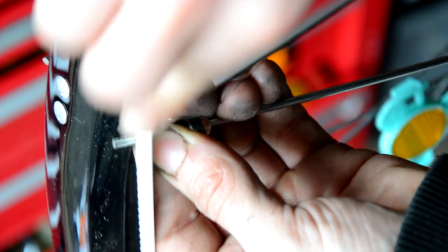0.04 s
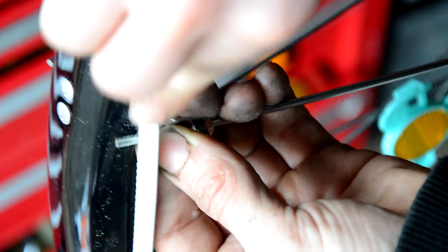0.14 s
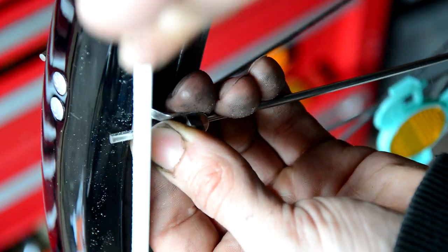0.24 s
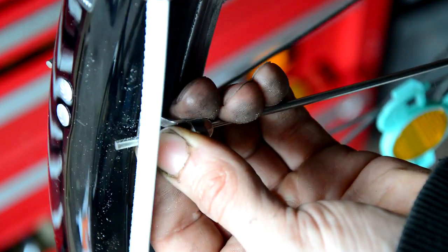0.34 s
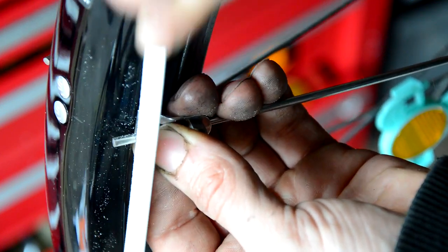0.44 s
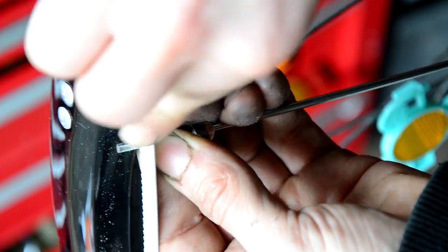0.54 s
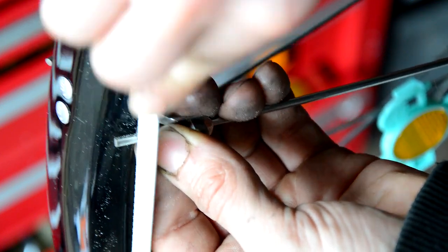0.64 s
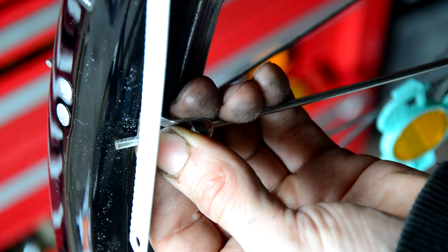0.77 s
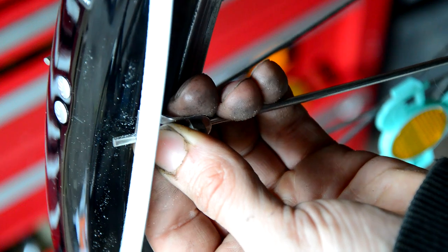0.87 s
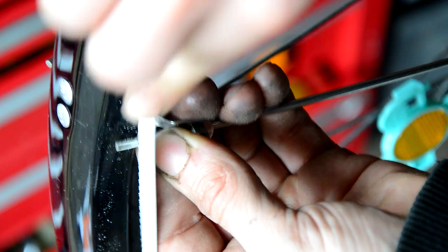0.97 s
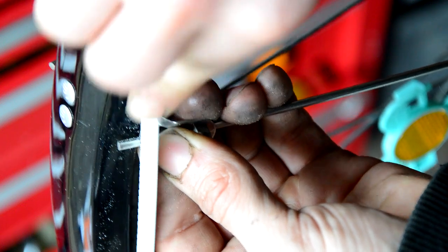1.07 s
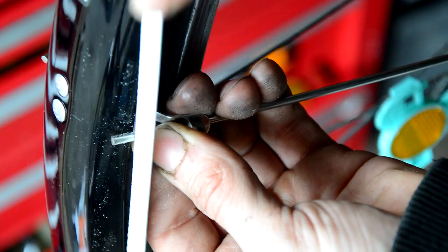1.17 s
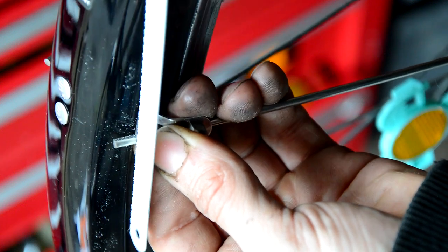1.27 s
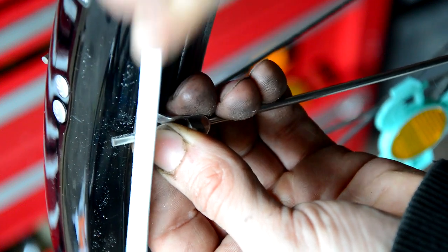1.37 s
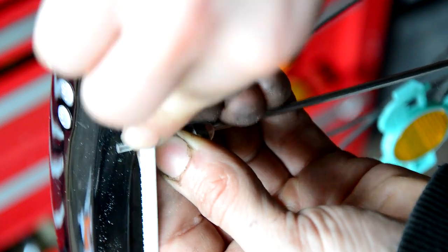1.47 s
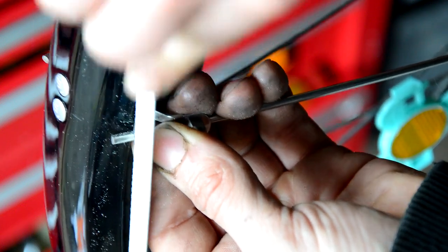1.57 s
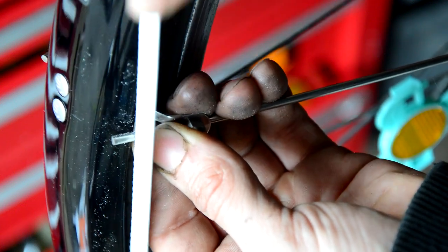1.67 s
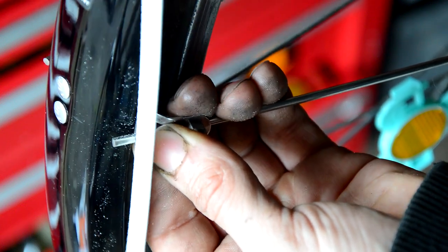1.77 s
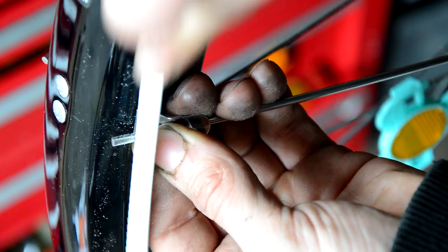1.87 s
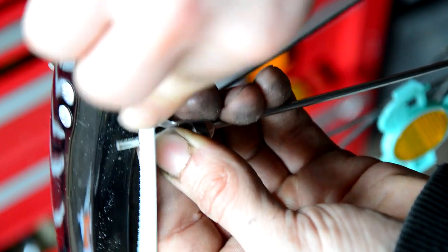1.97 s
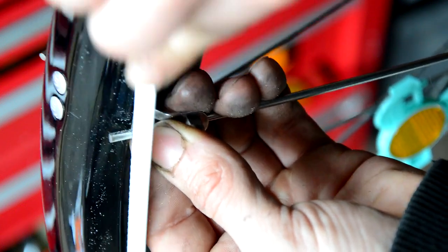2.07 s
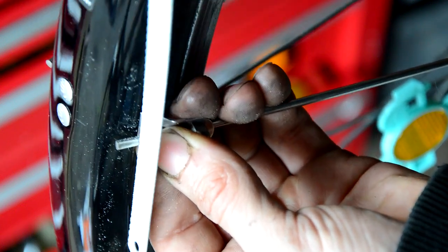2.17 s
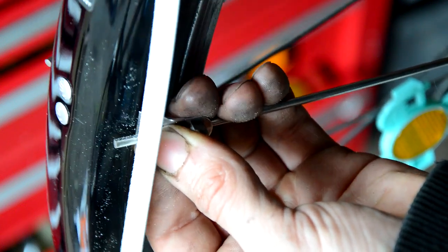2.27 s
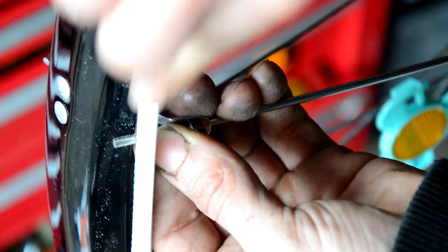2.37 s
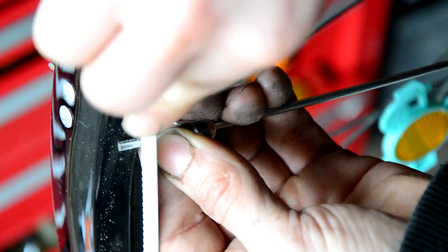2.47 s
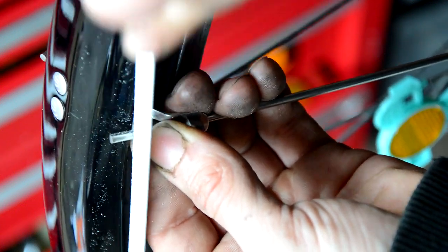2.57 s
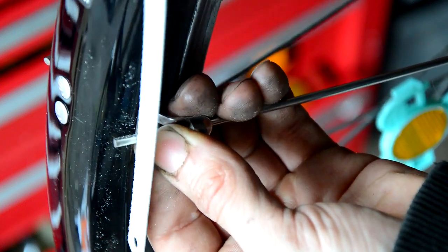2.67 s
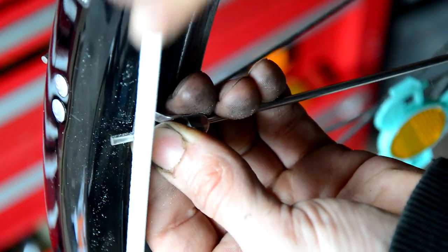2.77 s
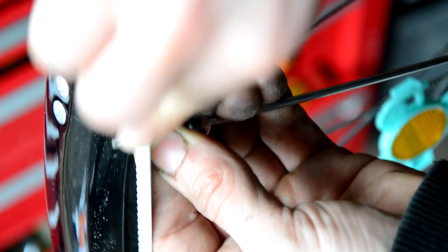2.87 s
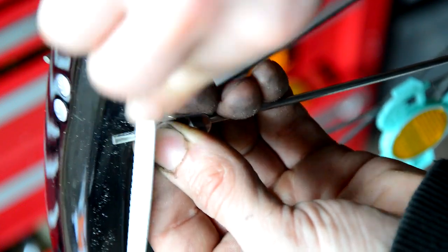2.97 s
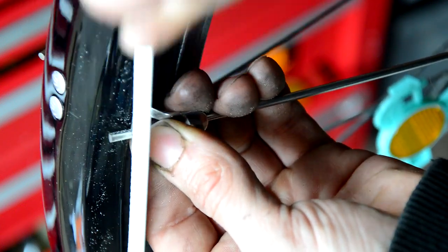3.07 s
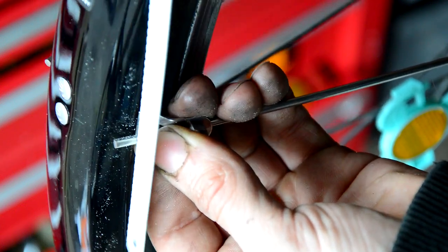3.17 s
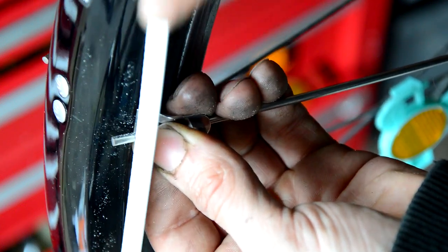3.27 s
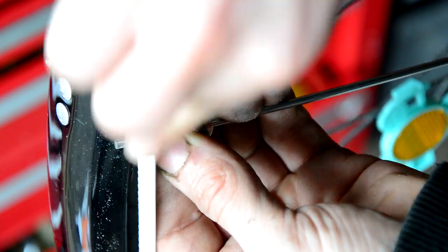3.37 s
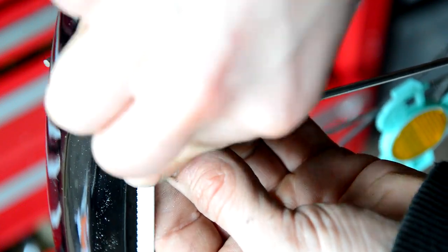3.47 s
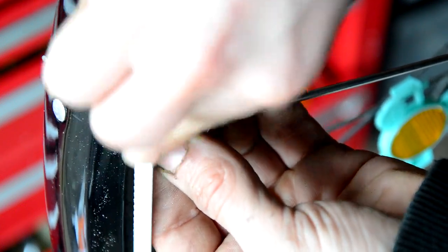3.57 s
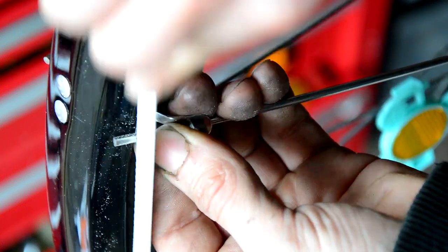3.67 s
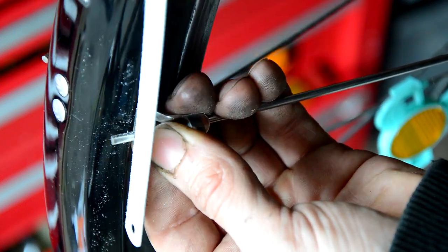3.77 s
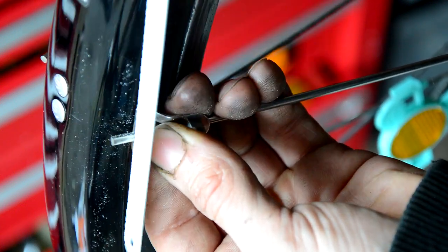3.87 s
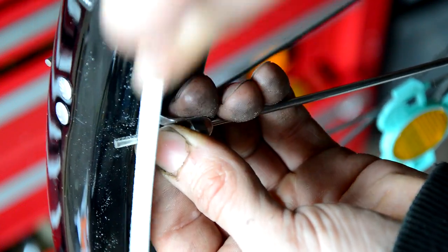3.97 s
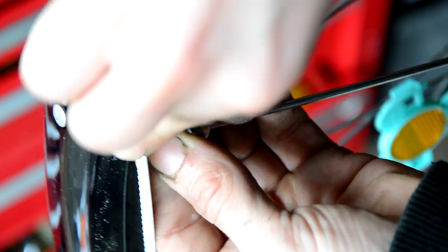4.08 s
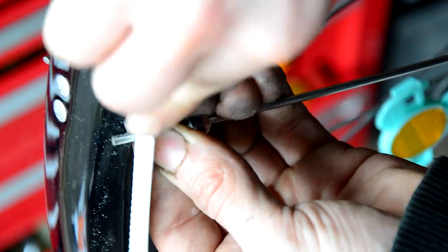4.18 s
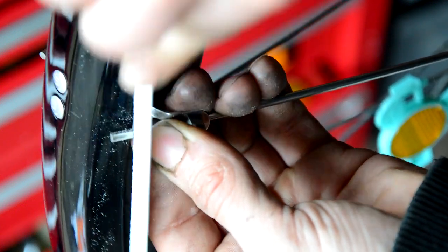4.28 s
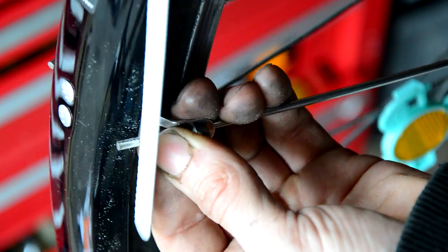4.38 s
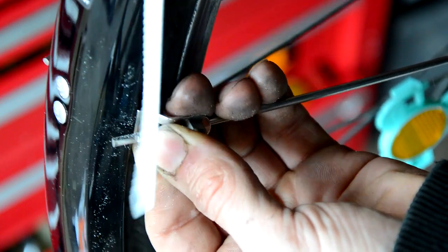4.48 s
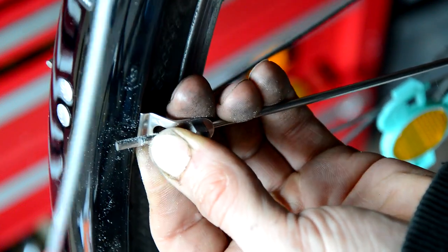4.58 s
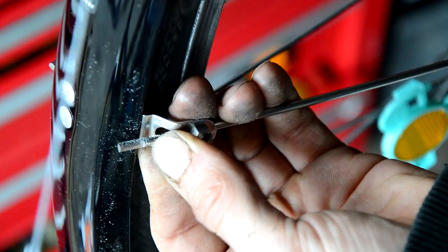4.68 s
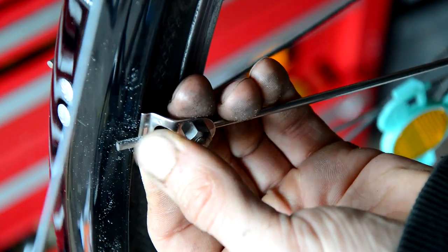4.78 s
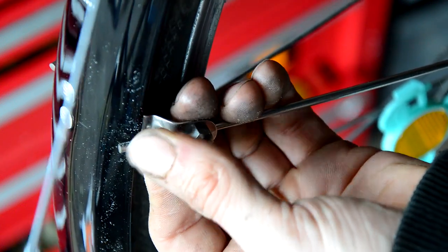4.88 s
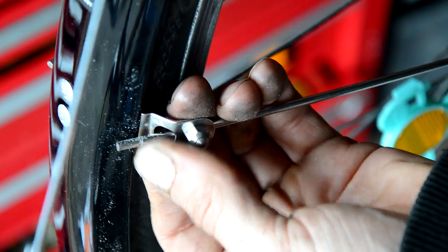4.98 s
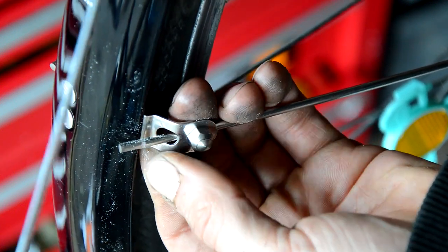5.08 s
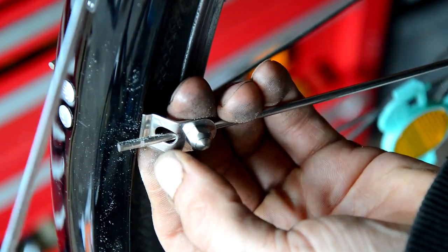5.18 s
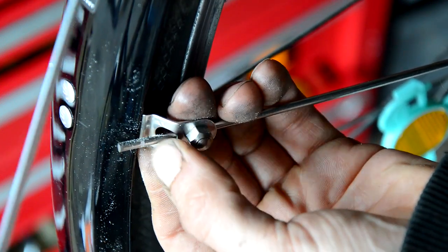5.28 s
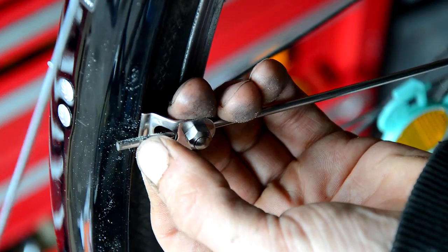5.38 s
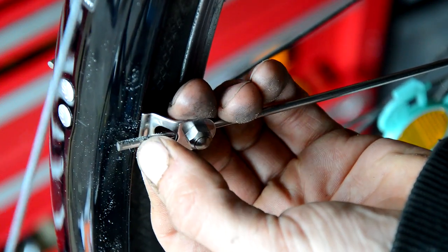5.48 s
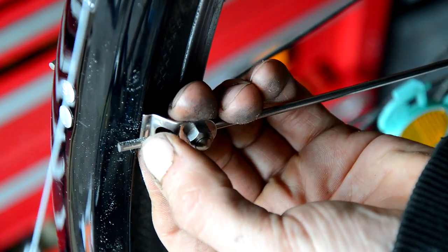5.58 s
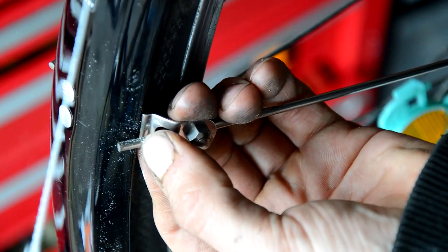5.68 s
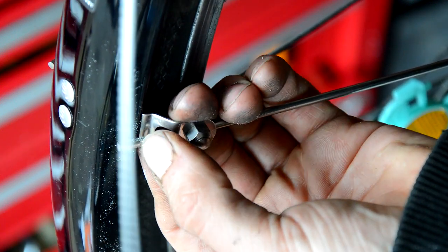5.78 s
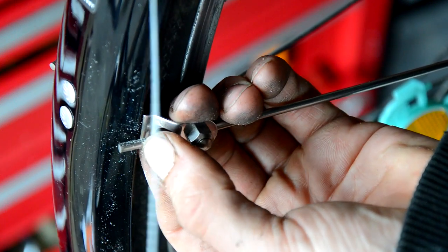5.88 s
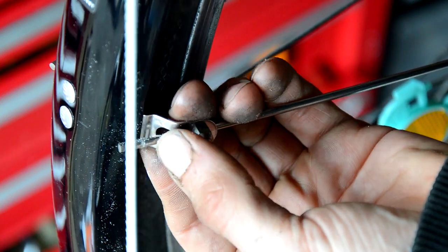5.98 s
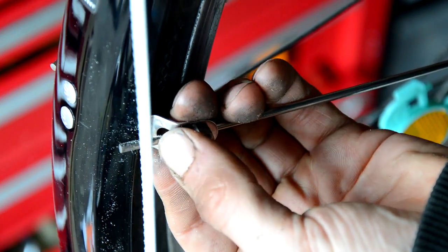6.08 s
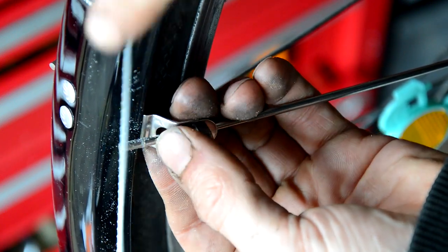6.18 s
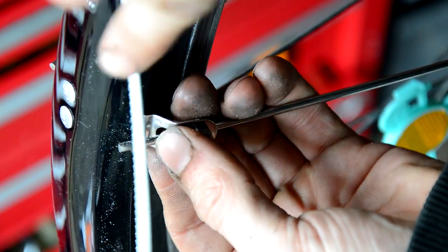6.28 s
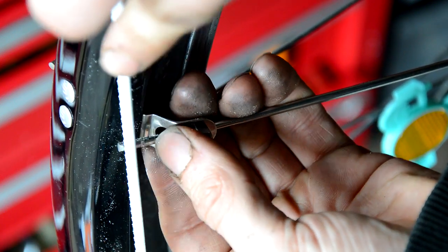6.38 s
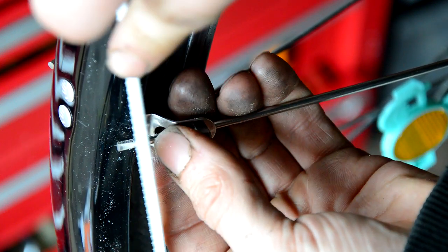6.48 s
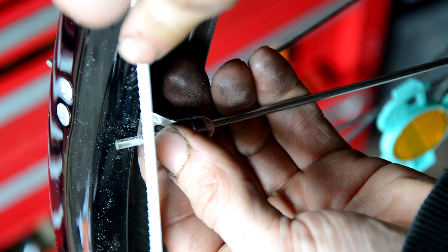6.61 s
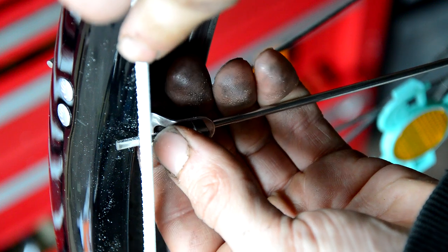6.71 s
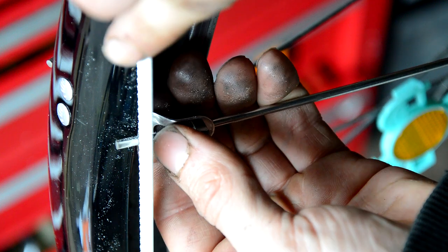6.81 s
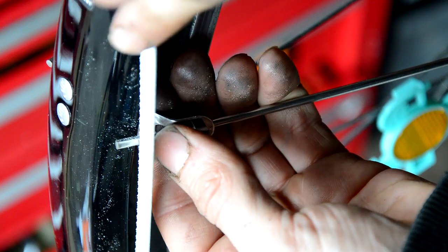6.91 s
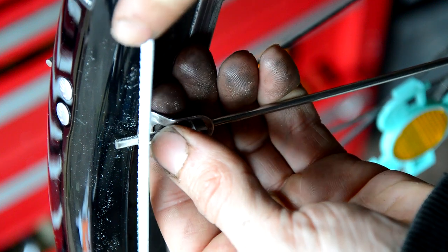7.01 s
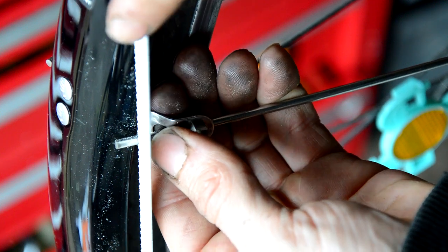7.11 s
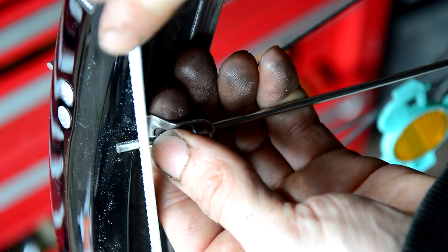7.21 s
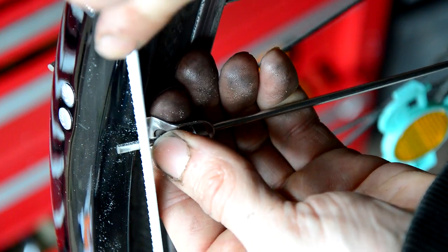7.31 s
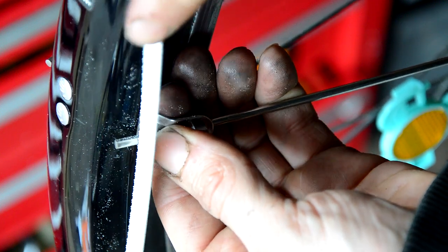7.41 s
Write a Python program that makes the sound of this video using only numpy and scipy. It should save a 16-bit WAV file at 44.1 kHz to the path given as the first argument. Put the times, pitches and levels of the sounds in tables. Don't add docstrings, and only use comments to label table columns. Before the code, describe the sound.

Very close to the microphone, a hand saws a thin steel rod with a bare hacksaw blade, about four strokes a second, gritty and ringing, with sharp snags and a gliding metallic song. The last strokes slow and catch hard. Then near silence with faint distant traffic hiss and engine drone, before small knocks and short scrapes as the blade is set down again in a small garage.

```python
import sys
import numpy as np
from scipy import signal
from scipy.fft import rfft, irfft
from scipy.io import wavfile
from scipy.ndimage import uniform_filter1d, map_coordinates

SR = 44100
rng = np.random.default_rng(int(sys.argv[2]) if len(sys.argv) > 2 else 0)


def generate_wav(signal):
    frames = np.transpose(np.atleast_2d(signal))
    scaled = np.clip(frames, -1, 1) * 32767
    pcm = np.round(scaled).astype(np.int16)
    wavfile.write(sys.argv[1], SR, pcm)


def voltage_ratio(decibels):
    exponent = np.asarray(decibels, float) / 20
    return 10 ** exponent


N = 328545
T = np.arange(N) / SR

# (frequency [Hz], density [dB per Hz])
ROAD_SPECTRUM = [(12, -47), (20, -1.5), (90, -7), (119, -5.5), (141, -11.5), (166, -13), (202, -14.5),
                 (291, -9.5), (441, -14.5), (480, -11.5), (536, -11.5), (886, -6.5), (3020, -23.5),
                 (15600, -32)]
# (time [s], level [dB])
ROAD_LEVEL = [(0.0, -47), (7.45, -49)]
# (time [s], free blade length [half-waves of 12 kHz bending])
REVERSALS = [(-.1, 8), (.15, 10.4), (.39, 6.8), (.61, 11.3), (.87, 8.3), (1.1, 9.6), (1.31, 6.5),
             (1.55, 15.2), (1.79, 6.4), (2.03, 16.5), (2.27, 7.7), (2.52, 13.8), (2.74, 7), (2.98, 11.3),
             (3.22, 7.34), (3.569, 14.2), (3.87, 6.1), (4.19, 11.2), (4.56, 5.3)]
# (time the teeth catch [s], length [s], scrape level [dB], place of the peak [0-1], catch level [dB])
STROKES = [(-.08, 0.18, -22, 0.66, -40), (0.186, 0.17, -21.5, 0.59, -19), (0.402, 0.16, -22, 0.58, -19.5),
           (0.6456, 0.19, -21.5, 0.6, -21.5), (0.887, 0.16, -21, 0.52, -20), (1.136, 0.16, -21, 0.36, -28),
           (1.3344, 0.19, -22.5, 0.57, -15.5), (1.5863, 0.17, -21, 0.48, -18),
           (1.8074, 0.16, -22.5, 0.57, -20), (2.071, 0.18, -22, 0.51, -32), (2.293, 0.21, -21.5, 0.53, -17),
           (2.554, 0.16, -20, 0.55, -20), (2.758, 0.17, -19, 0.59, -16.5), (3.0084, 0.19, -21, 0.55, -41),
           (3.243, 0.28, -24, 0.44, -9.5), (3.6253, 0.22, -21.5, 0.47, -28), (3.906, 0.2, -22, 0.65, -13.5),
           (4.2114, 0.25, -22.5, 0.63, -20)]
# (time [s], peak level [dB], thud above it [dB], fizz above it [dB])
SNAGS = [(.4387, -12, -20, 0.5), (.6713, -13, -6, -6), (.706, -11.5, -5, -16), (.7297, -8.5, -11, -25),
         (1.047, -11.5, -5, -7), (1.1349, -23, -1, -16.5), (1.1486, -10, -25, -28), (1.374, -21, -20, 4),
         (1.4301, -9.5, -16.5, 1), (1.4494, -5.5, -14, -17.5), (1.497, -13.5, -24, -2.5),
         (1.938, -5.5, -22, -9), (2.16, -10, -23, -24), (2.3179, -15.5, -23.5, 1), (2.6193, -11.5, 1.5, 0),
         (2.7829, -16, -6, 5), (2.904, -8, 0.5, -9), (3.021, -16, -21, -15), (3.3024, -14, -21.5, -1),
         (3.3356, -7.5, -13, -3), (3.4443, -8.5, -6.5, -6), (3.4823, -13.5, -4, -3.5),
         (4.121, -6.5, -8, -8.5), (4.2621, -19, -10.5, -18), (4.2774, -10.5, -12, -11),
         (4.3116, -2, -20.5, -10), (4.334, -3, -16, -7.5), (4.4369, -9, -12, -27), (4.4747, -11, -23, -4.5),
         (4.488, -14.5, -15, -3.5)]
# (at full pressure [dB],
# follow [dB per dB of pressure], reach [dB per doubled blade length], push [dB])
CUT_PATHS = [(-6.5, 0.61, 1, 1.5), (-4.5, 1.4, -5.5, -1), (-19, 0.27, 1, -1.5)]
# (frequency [Hz], width [Hz], level [dB])
CUT_MODES = [(251.8, 6.2, -6), (308, 16, -9.5), (515, 9.9, -7.5), (694, 31, -5.5), (811, 69, -3.5),
             (1126, 17, 3), (1181, 53, 0.5), (1576, 136, -7.5), (1994, 44, -6), (2606, 60, -7),
             (2763, 48, -4), (3088, 61, -3), (3260, 41, 0), (3332, 40, -0.5), (3870, 150, -10.5),
             (4360, 22, -4.5), (4890, 94, -10.5), (5278, 79, -8.5), (6070, 27, -10.5), (6380, 290, -18),
             (7210, 150, -12), (7800, 67, -20), (8800, 140, -19.5), (9000, 63, -23), (9800, 60, -19)]
# (frequency [Hz], density [dB per Hz])
STEEL_BED = [(90, -58.5), (190, -18), (420, -16.5), (800, -10), (1000, -9), (1400, -9), (2300, -15),
             (3300, -20), (3650, -12), (6000, -13.5), (10000, -22), (12500, -27.5), (16000, -62)]
# (time [s], firing rate [Hz], level [dB], second order level [dB])
PASSING_ENGINE = [
    (.85, 37.2, -54, -58),
    (1.2, 67.2, -46, -44),
    (1.37, 69.2, -47, -63),
    (1.47, 69.4, -47.5, -44),
    (2.01, 65.6, -57, -47),
    (2.61, 63.43, -50.5, -52.5),
    (3.17, 71.3, -54, -56.5),
    (3.8, 74.4, -58, -59.5),
    (4.3, 68.77, -75, -62),
]
# (time [s], frequency [Hz], level [dB])
SQUEAL = [
    (1.76, 8540, -53),
    (1.798, 8180, -45),
    (1.83, 8304, -48),
]
# (time [s], tooth rate [Hz], level [dB])
TOOTH_BEATS = [
    [(3.63, 216, -35), (3.67, 365, -59), (3.7, 453, -32), (3.73, 529, -26.5), (3.76, 498, -38),
     (3.79, 448.7, -59)],
    [(3.96, 331, -36), (4.0, 456.5, -57), (4.04, 539, -31.5), (4.07, 434, -47.5), (4.1, 293.4, -40),
     (4.13, 251.8, -60)],
    [(3.29, 280, -52), (3.34, 318, -49), (3.45, 328, -40), (3.54, 253.4, -48), (3.57, 245, -57)],
]
# (time [s], frequency [Hz], level [dB])
FAR_ENGINES = [
    [(3.9, 116, -63), (4.32, 114.5, -66), (5.3, 118.8, -63), (5.62, 119.3, -58.5), (5.9, 118, -63),
     (6.25, 118, -59)],
    [(6.15, 95.8, -63), (6.5, 104, -55), (6.75, 106, -59), (6.95, 105.2, -68), (7.21, 106.5, -56.5),
     (7.45, 109, -53)],
]
# (time [s], peak level [dB], thud above it [dB], fizz above it [dB])
KNOCKS = [(5.2699, -55, 0, -8.5), (5.5956, -46, 2, -13), (5.9563, -35.5, -15, -17), (5.969, -51, -7, -17.5),
          (6.4297, -23, -9.5, -9.5), (6.4918, -31.5, -20.5, -5), (6.557, -29, -17, -10),
          (6.582, -29.5, -6, -10), (6.608, -36, -8, -21), (6.6658, -35, -13, -17), (6.693, -26.5, -19, -9),
          (6.7193, -27, -18, -1.5), (6.822, -30, -12, -15), (6.8642, -21, -7, -10),
          (6.8933, -20, -11, -4.5), (6.995, -30, -13, -3), (7.01, -23, -10, -5.5), (7.0572, -31, -4, -6.5),
          (7.111, -23.5, -5.5, -12.5), (7.1198, -21.5, -6.5, -2), (7.178, -39.5, -3, -20.5)]
# (time [s], scrape level [dB])
NUDGES = [
    (6.428, -46),
    (6.456, -60.5),
    (6.69, -47.5),
    (6.722, -30.5),
    (6.782, -78),
    (6.9, -41),
    (6.926, -55),
    (7.136, -46),
    (7.25, -72),
]
# (at full pressure [dB], follow [dB per dB of pressure], reach [dB per doubled blade length], push [dB])
SLIDE_PATHS = [(-11, 0.65, 0, 0), (-6, 1.12, 0, 0), (-25.5, 0.39, 0, 0)]
# (frequency [Hz], width [Hz], level [dB])
RESTING_MODES = [(522, 37, -4), (1180, 66, -4), (1570, 58, -6.5), (2600, 110, -4.5), (3255, 145, 7),
                 (3814, 49, -16.5), (4100, 47, -2), (4384, 41, 3), (5270, 52, 3.5), (6200, 140, -4),
                 (7100, 280, -4), (7460, 130, -15), (8900, 200, -18), (10000, 180, -11)]
# (frequency [Hz], time to fall 60 dB [s])
ROOM_DECAY = [(200, 0.09), (2000, 0.3), (10000, 0.013)]


def unit(x):
    return x / np.sqrt(np.mean(x ** 2) + 1e-20)


def along(points, hz):
    f, v = np.transpose(points)
    return np.interp(np.log(hz + 1), np.log(f + 1), v)


def curves(rows):
    s, *cols = np.transpose(rows)
    gate = np.clip(np.minimum(T - s[0], s[-1] - T) / 0.01, 0, 1)
    return [np.interp(T, s, c) for c in cols] + [gate]


def wobble(rate):
    return map_coordinates(rng.standard_normal(int(N * rate / SR) + 4), [T * rate])


def causal(gain, size=8192):
    c = irfft(np.log(gain(np.fft.rfftfreq(size, 1 / SR)) + 1e-6))
    c[1:size // 2] *= 2
    c[size // 2 + 1:] = 0
    h = irfft(np.exp(rfft(c)))
    return h / np.linalg.norm(h)


def tone(hz, db, rough):
    phase = 2 * np.pi * np.cumsum(hz) / SR + rough * wobble(30)
    return np.sqrt(2) * voltage_ratio(db + 3.1 * rough * wobble(25)) * np.sin(phase)


def road():
    z = signal.stft(rng.standard_normal(N + 8192), nperseg=512)[2]
    patches = uniform_filter1d(uniform_filter1d(rng.standard_normal(z.shape), 6, 0), 14, 1)
    noise = signal.istft(z * voltage_ratio(0.7 * unit(patches)), nperseg=512)[1]
    colour = causal(lambda f: voltage_ratio(along(ROAD_SPECTRUM, f)))
    hiss = unit(signal.fftconvolve(noise, colour)[8192:N + 8192])
    return voltage_ratio(curves(ROAD_LEVEL)[0] + 0.6 * wobble(3.9)) * hiss


def blade_length():
    s, length = np.transpose(REVERSALS)
    step = np.interp(T, s, np.arange(len(s)))
    k = np.minimum(step.astype(int), len(s) - 2)
    swing = np.pi * (step - k)
    return length[k] + (length[k + 1] - length[k]) * (1 - np.cos(swing)) / 2, np.sin(swing)


def stroke_motion(length, speed):
    return np.log2(length / 9), -speed * np.sign(np.gradient(length))


def teeth(speed, top_rate, scatter_db, grit):
    scrape_s = 0.0008
    count = np.cumsum((60 + top_rate * speed) * voltage_ratio(2 * wobble(150))) / SR
    bites = np.diff(np.floor(count), prepend=0) * voltage_ratio(scatter_db * rng.standard_normal(N))
    scrape = signal.lfilter([1], [1, -np.exp(-1 / (scrape_s * SR))], bites)
    rough = unit(scrape * rng.standard_normal(N)) + grit * rng.standard_normal(N)
    return rough / np.sqrt(np.abs(uniform_filter1d(rough ** 2, 4000)) + 1e-9)


def tooth_bite(speed):
    unsteady = voltage_ratio(0.5 * wobble(40) + 0.8 * wobble(110))
    bite = teeth(speed, top_rate=520, scatter_db=2.5, grit=1.1) * unsteady
    return bite * np.where(T < REVERSALS[-1][0], 1 - 0.43 * np.exp(-(speed / 0.51) ** 2), 1)


def pressure():
    lead_s, swell, relax_s = 0.037, 0.94, 0.019
    level = np.zeros(N)
    for s, length, db, peak in np.array(STROKES)[:, :4]:
        lean = np.log(0.5) / np.log(np.clip(peak, 0.1, 0.95))
        place = np.clip((T - s + lead_s) / (length + lead_s), 0, 1) ** lean
        level += voltage_ratio(db) * np.abs(np.sin(np.pi * place)) ** swell
    keep = np.exp(-1 / (relax_s * SR))
    level = signal.lfilter([1 - keep], [1, -keep], level, zi=[level[0]])[0]
    return 20 * np.log10(level + 1e-5), np.clip((REVERSALS[-1][0] - T) * 20 + 1, 0, 1)


def force(db, gate, laws, motion, events, t60, bite, gain_db, boom_db):
    full_db = -22
    reach, push = motion
    thud, fizz, boom = [full_db + top + follow * (db - full_db) + longer * reach + down * push
                        for top, follow, longer, down in laws]
    out = np.pad(gate * bite * voltage_ratio(np.array([thud, db, fizz, boom])), [(0, 0), (0, SR)])
    t = T[:SR // 6]
    shape = voltage_ratio(-60 * t / max(t60, 0.004)) + 1.1 * voltage_ratio(-60 * t / 0.0064)
    shape *= 1 - np.exp(-t / 0.0002)
    for s, peak_db, thud_db, fizz_db in events:
        burst = voltage_ratio(peak_db + gain_db) * shape * np.sign(rng.standard_normal(len(t)))
        start = round(s * SR)
        out[:, start:start + len(t)] += voltage_ratio([[thud_db], [0], [fizz_db], [thud_db + boom_db]]) * burst
    return out[:, :N]


def paths(modes, bed_db, shift_db):
    shift = shift_db * rng.standard_normal(len(modes))
    bend = 1 + shift_db / 700 * rng.standard_normal(len(modes))

    def lines(f):
        return sum(voltage_ratio(db + d) ** 2 / (1 + (2 * (f - c * b) / w) ** 2)
                   for (c, w, db), d, b in zip(modes, shift, bend))

    def steel(f):
        return np.sqrt(voltage_ratio(along(STEEL_BED, f) + bed_db) ** 2 + lines(f) / (1 + (f / 11000) ** 8))

    def below(f, edge):
        return 1 / np.sqrt(1 + (f / edge) ** 8)

    def above(f, edge):
        return np.sqrt(1 - below(f, edge) ** 2)

    edges = [(420, 1800), (1800, 6500), (6500, 30000), (150, 420)]
    return [causal(lambda f: steel(f) * above(f, lo) * below(f, hi)) for lo, hi in edges]


def ring(push, modes, bed_db, shift_db):
    share = voltage_ratio(41 * np.array([wobble(rate) for rate in (9, 9, 13, 13, 7, 15)]))
    share = share / share.sum(0)
    metal = sum(signal.fftconvolve(push * w, paths(modes, bed_db, shift_db), axes=1)[:, :N] for w in share)
    return metal.sum(0)


def blade_song(fizz, length, width_hz, centre_hz, spread, flicker_db):
    n = round(REVERSALS[-1][0] * SR) + 4000
    song, pole = np.zeros(N), np.exp(-np.pi * width_hz / SR)
    for order in range(4, 15):
        hz = 12000 * (order / length[:n]) ** 2
        turn = np.exp(2j * np.pi * np.cumsum(hz) / SR)
        window = np.exp(-(np.log(hz / centre_hz) / spread) ** 2) * (hz < SR / 2)
        heard = window * voltage_ratio(flicker_db * wobble(70)[:n])
        mode = signal.lfilter([np.sqrt(1 - pole ** 2)], [1, -pole], fizz[:n] / turn) * turn
        song[:n] += heard * np.real(mode)
    return song


def sawing():
    length, speed = blade_length()
    catches = [(s, db, -7.5, -8) for s, *_, db in STROKES[1:]]
    cutting = force(*pressure(), CUT_PATHS, stroke_motion(length, speed), catches + SNAGS, t60=0.077,
                    bite=tooth_bite(speed), gain_db=-11.5, boom_db=-10.5)
    song = blade_song(cutting[2], length, width_hz=450, centre_hz=10800, spread=0.2, flicker_db=6.5)
    return ring(cutting, CUT_MODES, bed_db=-4.5, shift_db=3) + voltage_ratio(-13.5) * song


def garage(x):
    hz, t, z = signal.stft(rng.standard_normal(SR // 2), SR, nperseg=256)
    decay = voltage_ratio(-60 * t / along(ROOM_DECAY, hz)[:, None])
    tail = signal.istft(z * decay, SR, nperseg=256)[1]
    return signal.fftconvolve(np.pad(x, (300, 0)), tail / np.linalg.norm(tail))[:N]


def passing_engine():
    hz, db, second_db, gate = curves(PASSING_ENGINE)
    load = np.clip(np.gradient(uniform_filter1d(hz, 4000)) * SR / 60, 0, 1)
    third = load * tone(3 * hz, db - 6, rough=0.17)
    return gate * (third + tone(hz, db, rough=0.28) + tone(2 * hz, second_db, rough=0.54))


def whines():
    out = np.zeros(N)
    for rows, rough in zip([SQUEAL, *TOOTH_BEATS], [0.2, 0.5, 0.6, 1.5]):
        hz, db, gate = curves(rows)
        out += gate * tone(hz, db, rough)
    return out


def far_engines():
    return sum(gate * tone(hz, db, rough=0.16) for hz, db, gate in map(curves, FAR_ENGINES))


def setting_down():
    length, speed = blade_length()
    resting = force(*curves(NUDGES), SLIDE_PATHS, stroke_motion(length, speed), KNOCKS, t60=0.081,
                    bite=tooth_bite(speed), gain_db=-8, boom_db=-5.5)
    return ring(resting, RESTING_MODES, bed_db=0, shift_db=4)


def scene():
    work = sawing() + whines() + setting_down()
    outside = road() + passing_engine() + far_engines()
    return (work + voltage_ratio(-18) * garage(work) + outside)[None]


def top_cut(x):
    return signal.sosfilt(signal.butter(12, 15790, fs=SR, output="sos"), x)


def record(dry):
    hz = np.fft.rfftfreq(N, 1 / SR)
    band = (hz < 15790) / np.sqrt(1 + (40 / (hz + 1)) ** 6)
    return top_cut(irfft(rfft(dry) * band, N))


dry = scene()
out = record(dry)
generate_wav(out)
```